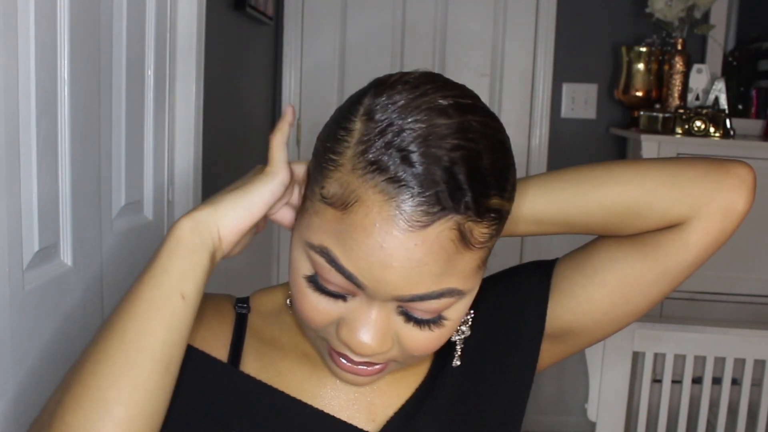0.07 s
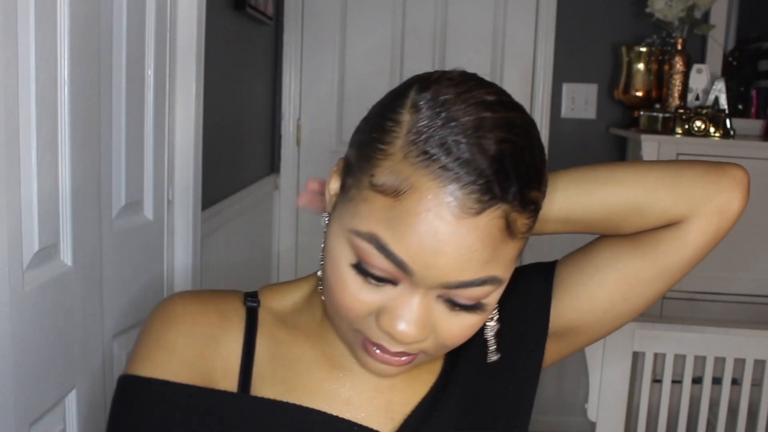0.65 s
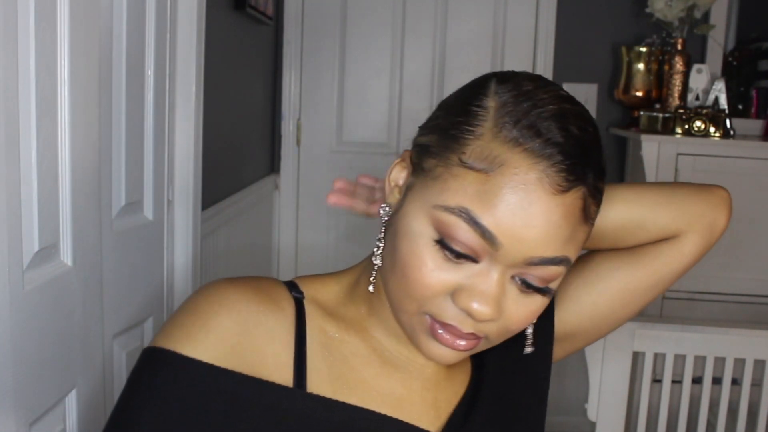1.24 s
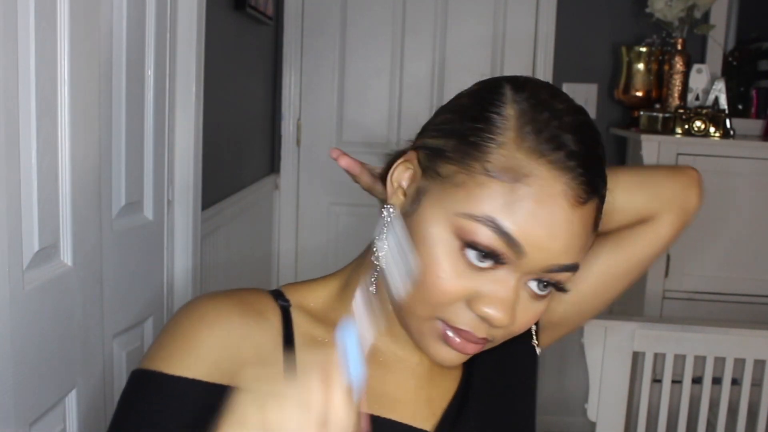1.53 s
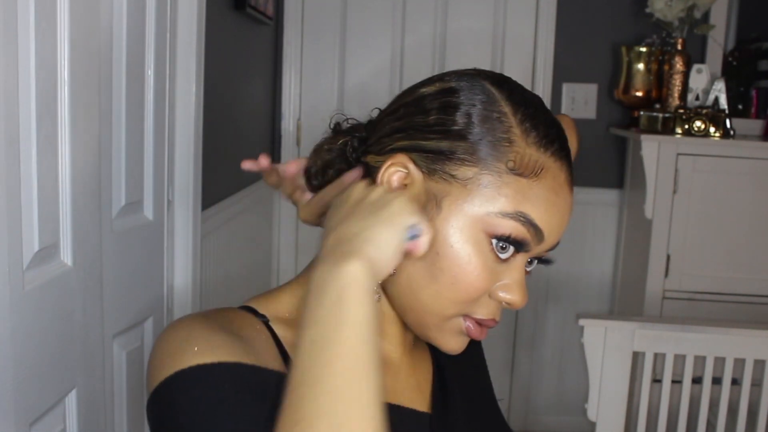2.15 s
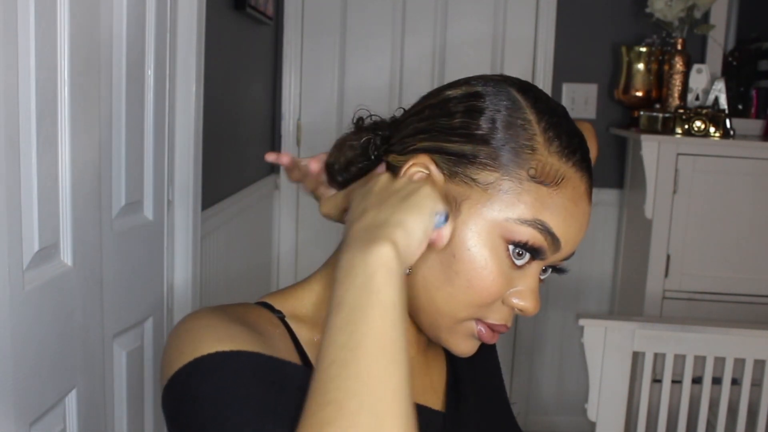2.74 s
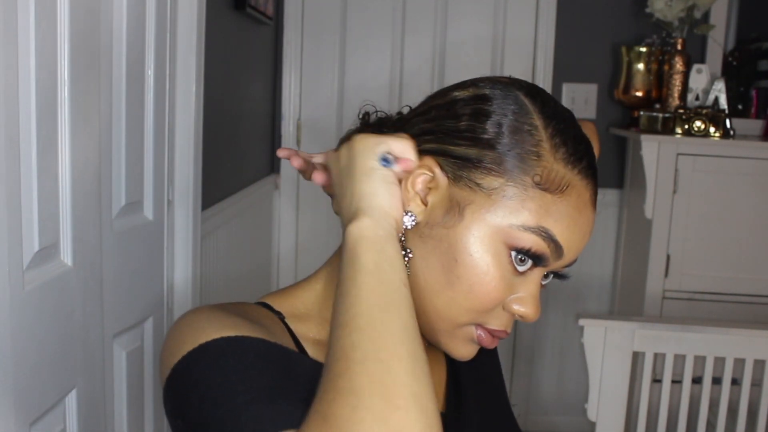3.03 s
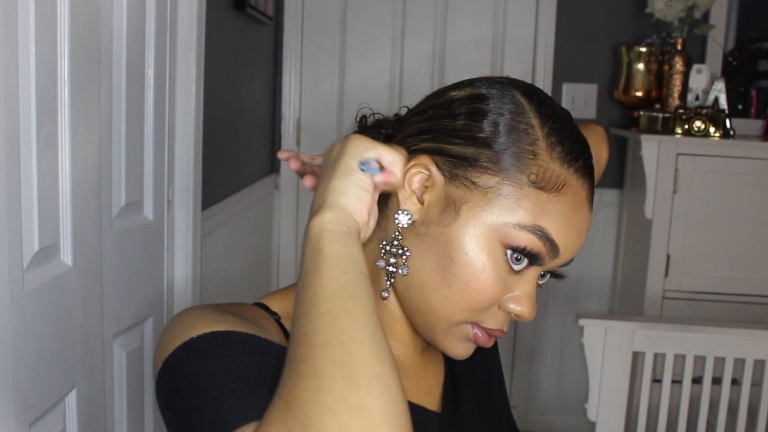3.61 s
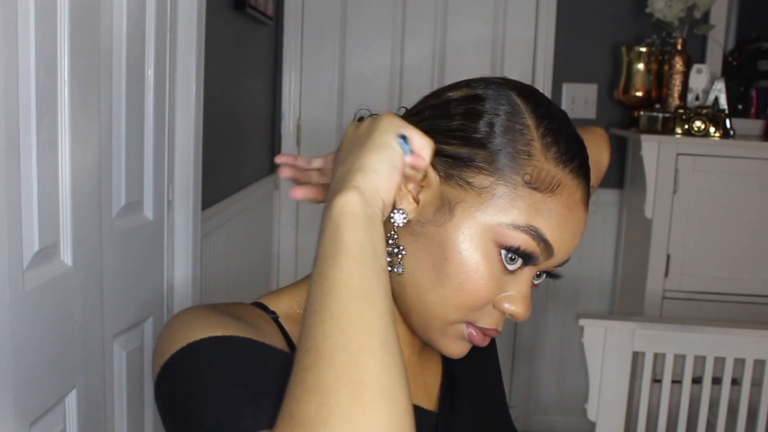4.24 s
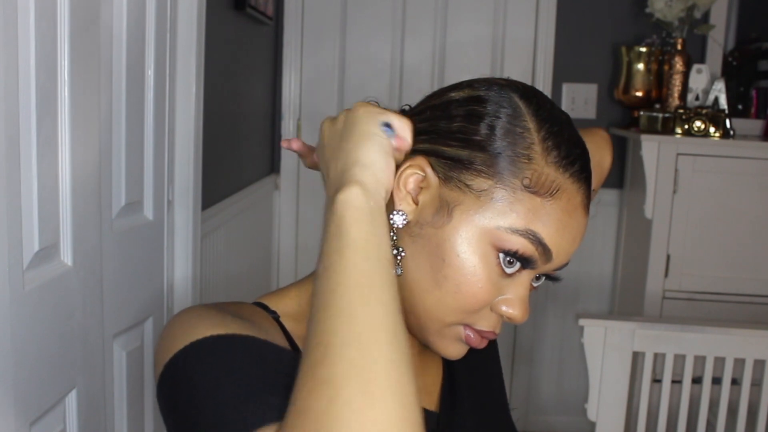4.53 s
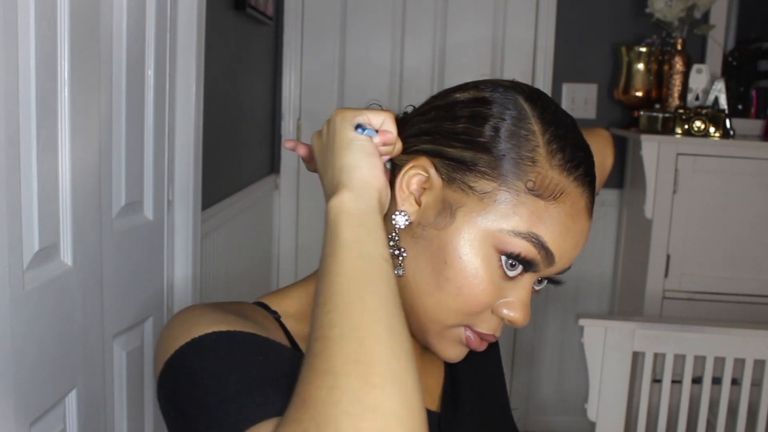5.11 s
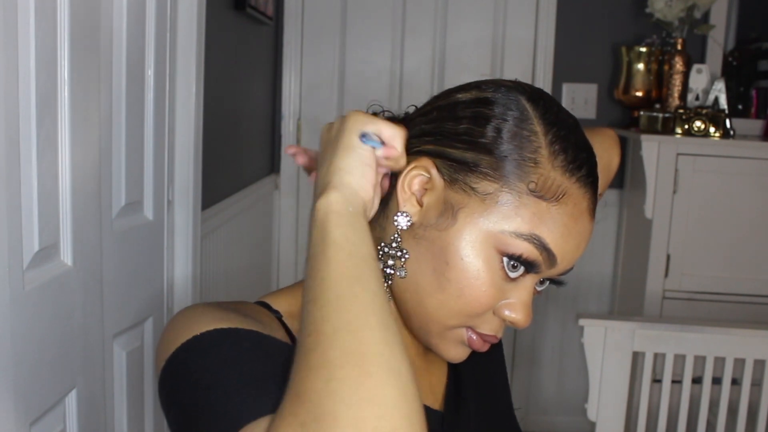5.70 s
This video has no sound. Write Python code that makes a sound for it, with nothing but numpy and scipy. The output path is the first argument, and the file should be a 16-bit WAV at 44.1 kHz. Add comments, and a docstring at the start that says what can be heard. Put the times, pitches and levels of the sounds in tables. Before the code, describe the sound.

A small room hums faintly while a lens motor ticks softly close to the microphone. About a second in, a plastic hairbrush is put down on a wooden dressing table with a quick clatter and one last knock. After a pause, fingers smooth gelled hair in faint, uneven strokes. An earring gives a tiny tink, and a fingernail snaps once on the stiff hair.

```python
"""Hairbrush and gelled hair

A small room hums faintly, and a camera's lens motor ticks close to the microphone.
A hairbrush is put down on a dressing table: it clatters, clicks and knocks once more, each impact
exciting the modes of wood and plastic. Then fingers smooth gelled hair in soft strokes of friction
noise. An earring tinks as the hands move, and a fingernail snaps on the stiff hair."""
import sys
import numpy as np
from scipy import signal
from scipy.fft import rfft, irfft, next_fast_len
from scipy.io import wavfile
from scipy.ndimage import map_coordinates

SR = 44100
rng = np.random.default_rng(int(sys.argv[2]) if len(sys.argv) > 2 else 0)


def unload_audio(sound):
    """Save the sound as a 16-bit wav file, at the path given as the first command line argument."""
    columns = np.transpose(np.atleast_2d(sound))
    # keep every value between -1 and 1, then stretch to whole-number steps
    steps = np.round(np.clip(columns, -1, 1) * 32767)
    wavfile.write(sys.argv[1], SR, steps.astype(np.int16))


N = 253957
T = np.arange(SR // 4) / SR  # time within one impact, s


def amp(db):
    """Decibels to amplitude ratio."""
    return 10 ** (np.asarray(db) / 20)


def unit(x):
    """Power normalisation to rms 1."""
    return x / np.sqrt(np.mean(x ** 2) + 1e-20)


def unit_impact(x):
    """Energy normalisation: a short sound gets the energy of 10 ms at rms 1."""
    return x / np.sqrt(np.sum(x ** 2) / (SR / 100) + 1e-20)


def decay(t, t60):
    """Exponential decay, 60 dB down after t60."""
    return np.exp(-np.log(1000) * t / t60)


def along(points, hz):
    """Interpolation of (frequency, value) points on a logarithmic frequency axis."""
    point_hz, values = np.transpose(points)
    return np.interp(np.log(hz + 1), np.log(point_hz + 1), values)


def filtered(x, response):
    """Linear filtering: the spectrum is multiplied by a frequency response."""
    size = next_fast_len(len(x) + SR // 4)
    return irfft(rfft(x, size) * response(np.fft.rfftfreq(size, 1 / SR)), size)[:len(x)]


def coloured(x, spectrum):
    """Spectral shaping, normalised to rms 1."""
    return unit(filtered(x, lambda hz: amp(along(spectrum, hz))))


def radiated(x, low_hz, high_hz, order):
    """Band-pass radiation: a small body gives no bass, and a soft contact no treble."""
    band = signal.butter(order, [low_hz, high_hz], "bandpass", fs=SR, output="sos")
    return unit_impact(signal.sosfilt(band, x))


def wobble(per_second):
    """Random modulation: a smooth curve through Gaussian points."""
    points = rng.standard_normal(int(N * per_second / SR) + 4)
    return map_coordinates(points, [np.arange(N) * per_second / SR])


def add(track, start_s, sound):
    """Superposition of a sound on the track."""
    part = track[max(round(start_s * SR), 0):][:len(sound)]
    part += sound[:len(part)]


def burst(spectrum, t60_s):
    """A broadband transient: coloured noise under exponential decay."""
    return unit_impact(coloured(rng.standard_normal(len(T)), spectrum) * decay(T, t60_s))


def ring(modes, centre_hz, focus_db, attack_s, rough, t60_scale=1):
    """Modal vibration: damped sines; positive focus favours modes near the centre, negative far ones."""
    hz, db, t60 = np.transpose(modes)[:, :, None]
    level = amp(db - focus_db * np.log2(hz / centre_hz) ** 2 + 2.0 * rng.standard_normal(hz.shape))
    # a loose contact blurs each mode: its phase takes a random walk
    drift = rough * np.cumsum(rng.standard_normal((len(hz), len(T))), axis=1) * np.sqrt(hz / SR)
    phase = 2 * np.pi * (hz * T + rng.random(hz.shape)) + drift
    partials = level * decay(T, t60 * t60_scale) * np.sin(phase)
    return unit_impact(partials.sum(axis=0) * (1 - np.exp(-T / attack_s)))


# reverberation time of the room: frequency_hz, t60_s
ROOM_DECAY = [(150, 0.21), (500, 0.24), (1500, 0.35), (4400, 0.24), (8000, 0.29), (15000, 0.06)]
def in_room(x, wet_db, near_db=-6):
    """Reverberation: direct sound, early reflections off furniture and the walls' diffuse tail."""
    hz, t, noise = signal.stft(rng.standard_normal(SR // 2), SR, nperseg=256)
    build_up = 1 - np.exp(-(t / 0.011) ** 2)
    tail = signal.istft(noise * decay(t, along(ROOM_DECAY, hz)[:, None]) * build_up, SR, nperseg=256)[1]
    delays = (rng.uniform(0.002, 0.009, size=6) * SR).astype(int)
    reflections = np.bincount(delays, rng.standard_normal(6), len(tail))
    out = np.pad(x, (0, len(tail) - 1))
    for response, db in ((reflections, near_db), (tail, wet_db)):
        echo = signal.fftconvolve(x, response)
        out = out + amp(db) * np.linalg.norm(x) / np.linalg.norm(echo) * echo
    return out * np.linalg.norm(x) / np.linalg.norm(out)


# narrow noise bands of the equipment: centre_hz, width_hz, level_db
HUM_BANDS = [(50, 18, -64), (358, 31, -64), (486, 14, -70), (2140, 76, -75), (6470, 77, -75),
             (12968, 200, -80), (15181, 200, -85)]
# thin tones of the equipment: pitch_hz, level_db
WHINE_TONES = [(2157, -70.5), (15182, -88)]
# air noise: frequency_hz, relative_density_db
AIR_SPECTRUM = [(20, -44), (32, -24), (46, -10), (70, 0), (107, -2), (172, -9.5), (250, -9), (400, -7),
                (677, -12.5), (1030, -14.5), (2000, -17.5), (3520, -19.5), (6340, -23.5), (10000, -27.5),
                (15900, -36)]
def room_tone():
    """Stationary background: broadband air noise, narrowband hums and two slightly drifting tones."""
    def hum_response(f):
        """Gaussian bands of power density, as a gain on white noise."""
        density = sum(amp(db) ** 2 / width * np.exp(-np.pi * ((f - hz) / width) ** 2)
                      for hz, width, db in HUM_BANDS)
        return np.sqrt(density * SR / 2)

    hum = filtered(rng.standard_normal(N), hum_response)
    drift_hz = 2.9
    whine = sum(amp(db) * np.sin(2 * np.pi * np.cumsum(hz + drift_hz * wobble(12)) / SR)
                for hz, db in WHINE_TONES)
    air = amp(-54.5) * coloured(rng.standard_normal(N), AIR_SPECTRUM)
    return hum + whine + air


# modes of the lens barrel: pitch_hz, relative_level_db, t60_s
BARREL_MODES = [(447, -1, 0.039), (527, 8, 0.019), (750, -3.5, 0.066), (931, -3, 0.068),
                (1150, -4.5, 0.036)]
# spells of focus hunting: start_s, end_s
FOCUS_HUNTS = [(.033, 1.49), (1.5, 2.8), (2.867, 2.96), (3.033, 5.76)]
def lens_motor():
    """Periodic impulse excitation: the focus motor nudges the barrel on four steps in every nine."""
    step_hz, lead_s = 30, 0.0065
    out = np.zeros(N)
    for start_s, end_s in FOCUS_HUNTS:
        steps = np.arange(np.ceil((end_s - start_s) * step_hz))
        for step in steps[np.isin(steps % 9, (0, 2, 4, 6))]:
            barrel = ring(BARREL_MODES, 750, focus_db=1.0, attack_s=0.0033, rough=0.16)
            tick = amp(-56.5) * radiated(barrel, low_hz=310, high_hz=1520, order=2)
            add(out, start_s + step / step_hz - lead_s, tick)
    return out


# modes of the earring: pitch_hz, relative_level_db, t60_s
EARRING_MODES = [(5330, -4, 0.02), (5470, -4.5, 0.021), (8740, 1, 0.026), (9520, 2.5, 0.014),
                 (13100, -17, .02)]
# its links touch: start_s, level_db
EARRING_TINKS = [(.69, -67), (0.819, -62), (3.516, -50)]
def earring():
    """Free vibration: small links collide and ring briefly in their high modes."""
    out = np.zeros(N)
    for start_s, level_db in EARRING_TINKS:
        tink = ring(EARRING_MODES, 7900, focus_db=-22, attack_s=0.00073, rough=0.24)
        add(out, start_s, in_room(amp(level_db) * tink, wet_db=-11))
    return out


# modes of the table top: pitch_hz, relative_level_db, t60_s
TABLE_MODES = [(130, 0, 0.08), (300, -42, 0.041), (322.6, -2, 0.072), (439, 1.5, 0.038), (567, -0.5, 0.027),
               (649, 3, 0.03), (782, 3.5, 0.027), (920, -8, 0.049), (1098, -1, 0.021), (1280, -2.5, 0.021),
               (1562, -1, 0.03), (1910, -0.5, 0.015)]
# modes of the brush's plastic body: pitch_hz, relative_level_db, free_t60_s
BRUSH_MODES = [(2440, 2.5, 0.033), (2940, -2, 0.038), (3420, -13, 0.013), (4090, 6.5, 0.015),
               (4420, 2.5, 0.072), (4670, 8, 0.036), (5100, 4, 0.067)]
# noise at the point of contact: frequency_hz, relative_density_db
CRACK_SPECTRUM = [(100, -17), (1500, 15.5), (3000, 19), (5500, 15.5), (7500, 7.5), (10000, 2), (16000, -13)]
# brush meets table: start_s, thud_db, thud_centre_hz, click_db, click_centre_hz, crack_db
BRUSH_IMPACTS = [(0.9381, -37.5, 444, -35.5, 4750, -38), (0.9508, -36.5, 480, -37, 5070, -39),
                 (0.963, -28.5, 497, -45, 4580, -42), (0.9693, -26.5, 645, -39, 4770, -35),
                 (0.9762, -28, 620, -24.5, 5440, -28), (1.003, -24.5, 834, -48, 4230, -39),
                 (1.0234, -19.5, 383, -61, 3990, -58), (1.03, -23.5, 570, -60, 2660, -60),
                 (1.041, -22, 920, -39.5, 3950, -58), (1.071, -21, 367, -47, 4630, -32.5),
                 (1.087, -53, 713, -32.5, 4700, -42), (1.0935, -24, 760, -36.5, 3740, -34),
                 (1.111, -23, 480, -61, 3450, -46), (1.1323, -18, 523, -32, 4070, -38),
                 (1.164, -23.5, 755, -40, 3130, -46), (1.214, -44, 662, -26, 4290, -35.5),
                 (1.256, -37.5, 1110, -57, 3000, -46), (1.3939, -27, 530, -41, 4270, -47)]
def brush_on_table():
    """Impact excites both bodies: the table thuds, the plastic clicks and the contact point cracks."""
    grip = 0.37  # damping by the hand: the share of its free ring time that the brush keeps
    out = np.zeros(N)
    for start_s, thud_db, thud_hz, click_db, click_hz, crack_db in BRUSH_IMPACTS:
        wood = ring(TABLE_MODES, thud_hz, focus_db=3.5, attack_s=0.0008, rough=0.33)
        plastic = ring(BRUSH_MODES, click_hz, focus_db=10, attack_s=0.0003, rough=0.35, t60_scale=grip)
        thud = amp(thud_db) * radiated(wood, low_hz=191, high_hz=2420, order=2)
        # the contact time sets the click's upper cutoff
        click = amp(click_db) * radiated(plastic, low_hz=1960, high_hz=click_hz, order=6)
        crack = amp(crack_db) * burst(CRACK_SPECTRUM, t60_s=0.04)
        add(out, start_s, in_room(thud, wet_db=-7, near_db=-8))
        add(out, start_s, in_room(click + crack, wet_db=-3.5, near_db=-6.5))
    return out


def friction(spectrum, slips_per_s, grain_share):
    """Stick-slip friction: countless tiny slips of single strands, mixed with a smooth hiss."""
    slips = (rng.random(N) < slips_per_s / SR) * rng.standard_normal(N)
    hiss = rng.standard_normal(N)
    return coloured(np.sqrt(grain_share) * unit(slips) + np.sqrt(1 - grain_share) * hiss, spectrum)


def stroke(peak_s, swell_s, release_s):
    """Amplitude envelope: the fingers gather speed along the hair, then lift off."""
    t = np.arange(N) / SR - peak_s
    return np.clip(1 + t / swell_s, 0, 1) ** 1.1 * np.clip(1 - t / release_s, 0, 1) ** 1.13


def earring_response(f):
    """Resonance: a peak of half-width 130 Hz at each mode of the earring."""
    return sum(amp(db) / (1 + ((f - hz) / 130) ** 2) for hz, db, _ in EARRING_MODES)


# hair under pressing, slow and fast fingers: frequency_hz, relative_density_db
RUB_SPECTRUM = [(300, -7), (1000, -3.5), (2000, 4.5), (4000, 6), (6000, -9), (12000, -9)]
SLOW_SPECTRUM = [(2500, -25), (4700, -6.5), (5350, 2), (5900, -1.5), (6900, 2), (8200, -6), (10500, -11),
                 (16000, -16)]
FAST_SPECTRUM = [(2500, -21), (5000, -11), (6500, -22), (8300, -4.5), (9700, -12.5), (10600, -9),
                 (13000, -13.5), (16000, -35)]
# finger strokes: peak_s, swell_s, release_s, rub_db, sheen_db, speed (0 to 1)
HAIR_STROKES = [(2.50, .36, .08, -68, -63.5, 0.4), (2.559, 0.046, 0.04, -54.5, -50, 0.37),
                (2.942, 0.063, 0.055, -61.5, -53.5, 0.6), (3.15, .24, 0.085, -59, -57.5, 0.34),
                (3.55, 0.15, 0.23, -69, -64, 0.3), (3.74, .15, .06, -68, -65, 0.2),
                (3.89, 0.13, .06, -56.5, -61.5, 0.2), (4.28, .07, .08, -70, -61, 0.74),
                (4.51, 0.36, 0.13, -62, -56, 0.2), (4.59, .04, 0.019, -60, -61, .5),
                (4.94, 0.056, 0.059, -64, -58.5, .45), (5.115, 0.098, .05, -61, -53, 0.03),
                (5.18, .06, .09, -61.5, -56, 0.26), (5.245, 0.037, 0.021, -57, -59, 0.6),
                (5.59, 0.077, .14, -65, -60, .35), (5.73, 0.043, .06, -62, -58.5, 0.4)]
def hair_strokes():
    """Friction noise: pressing gives a dull rub, sliding a sheen that brightens with speed."""
    rub_power, slow_power, fast_power = np.zeros((3, N))
    for peak_s, swell_s, release_s, rub_db, sheen_db, speed in HAIR_STROKES:
        touch = stroke(peak_s, swell_s, release_s)
        rub_power += (amp(rub_db) * touch) ** 2  # incoherent sources add in power
        slow_power += (1 - speed) * (amp(sheen_db) * touch) ** 2
        fast_power += speed * (amp(sheen_db) * touch) ** 2
    rub = np.sqrt(rub_power) * friction(RUB_SPECTRUM, slips_per_s=1400, grain_share=0.21)
    slow = np.sqrt(slow_power) * friction(SLOW_SPECTRUM, slips_per_s=1200, grain_share=0.78)
    fast = np.sqrt(fast_power) * friction(FAST_SPECTRUM, slips_per_s=1400, grain_share=1.0)
    # the sliding hand stirs the earring too
    stirring = friction(FAST_SPECTRUM, slips_per_s=200, grain_share=0.76)
    shimmer = amp(-9) * np.sqrt(slow_power + fast_power) * unit(filtered(stirring, earring_response))
    flicker = amp(1.1 * wobble(45))
    return in_room((rub + slow + fast + shimmer) * flicker, wet_db=-10.5)[:N]


# noise of a nail on stiff hair: frequency_hz, relative_density_db
SNAP_SPECTRUM = [(500, -19), (2300, -13), (3000, 5), (4300, -5), (6500, -5), (10000, -8), (16000, -25)]
# the nail snaps: start_s, level_db
NAIL_SNAPS = [(4.677, -46), (4.682, -57)]
def nail_snap():
    """Impulsive excitation: a fingernail snaps on stiff hair with a short burst of noise."""
    out = np.zeros(N)
    for start_s, level_db in NAIL_SNAPS:
        snap = amp(level_db) * burst(SNAP_SPECTRUM, t60_s=0.021)
        add(out, start_s, in_room(snap, wet_db=-6))
    return out


def scene():
    """Superposition of all sources at one microphone."""
    return (room_tone() + lens_motor() + earring() + brush_on_table() + hair_strokes() + nail_snap())[None]


def record(dry):
    """Band limiting: an ideal low-pass filter passes nothing above 15.9 kHz."""
    return np.array([filtered(channel, lambda hz: hz < 15900) for channel in dry])


dry = scene()
out = record(dry)
unload_audio(out)
```